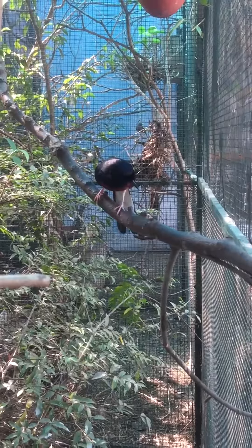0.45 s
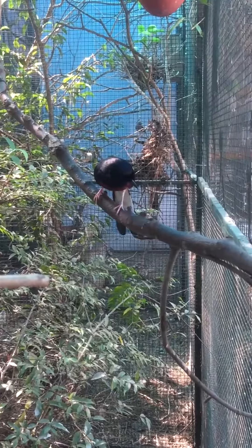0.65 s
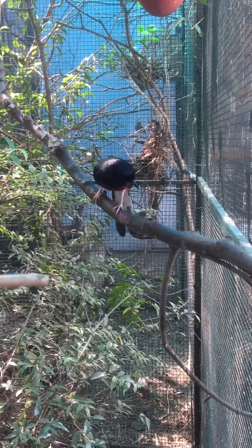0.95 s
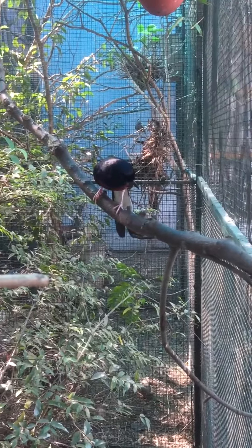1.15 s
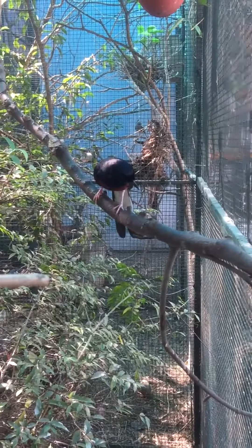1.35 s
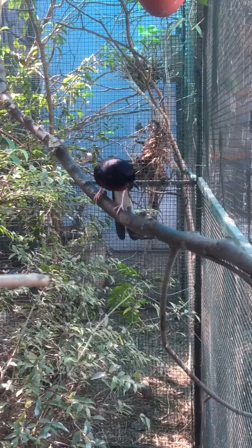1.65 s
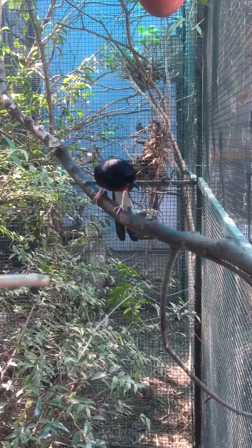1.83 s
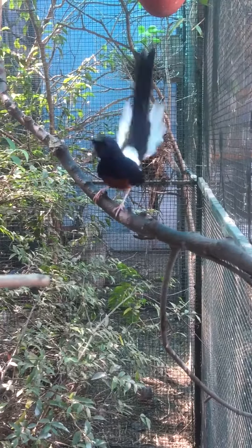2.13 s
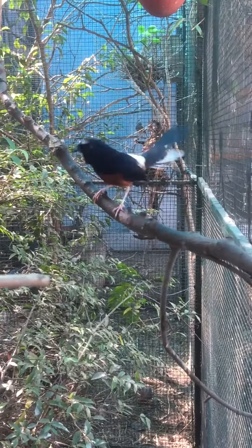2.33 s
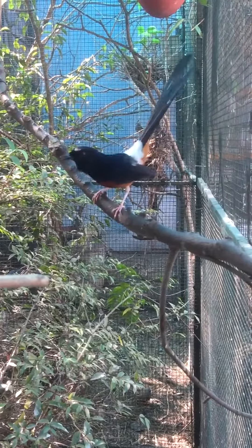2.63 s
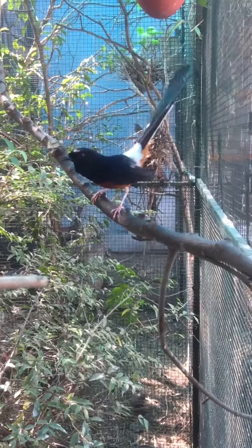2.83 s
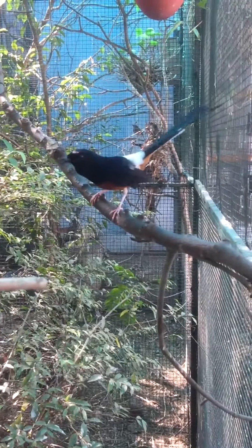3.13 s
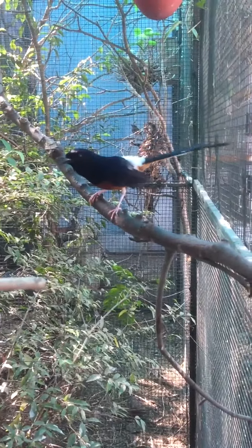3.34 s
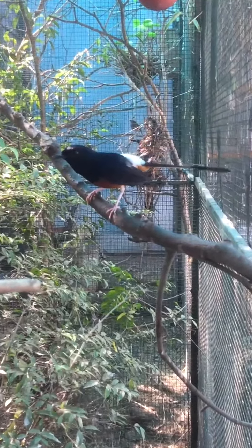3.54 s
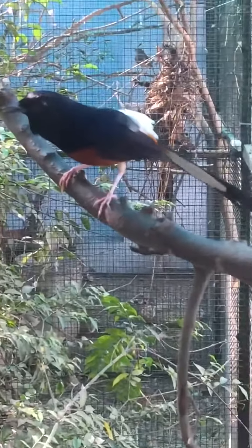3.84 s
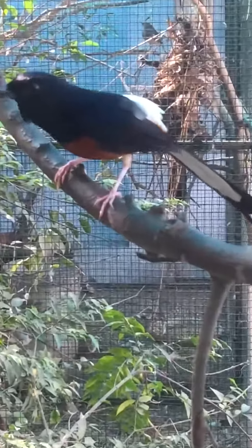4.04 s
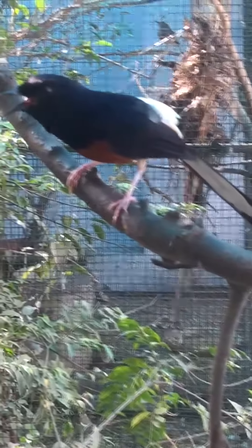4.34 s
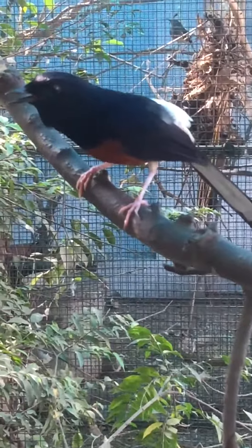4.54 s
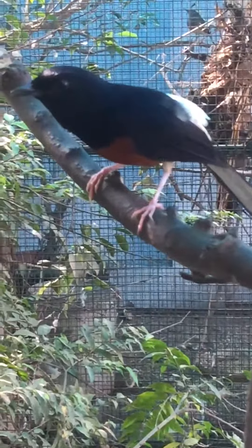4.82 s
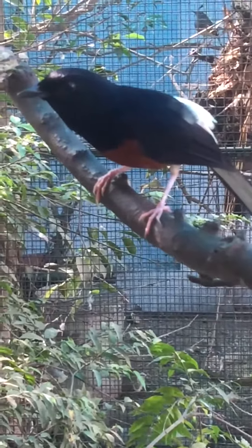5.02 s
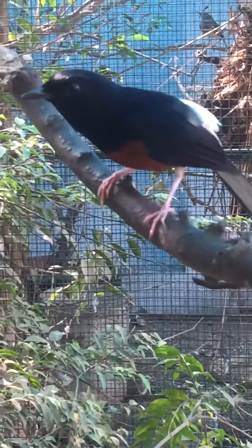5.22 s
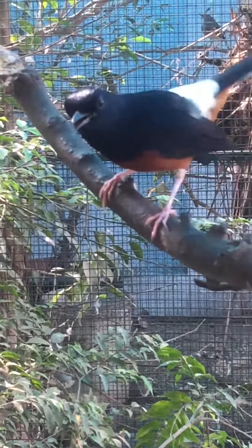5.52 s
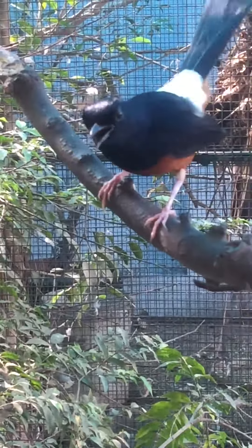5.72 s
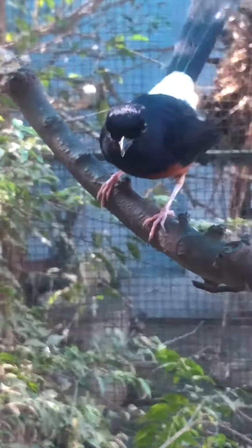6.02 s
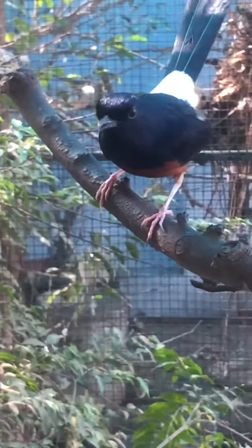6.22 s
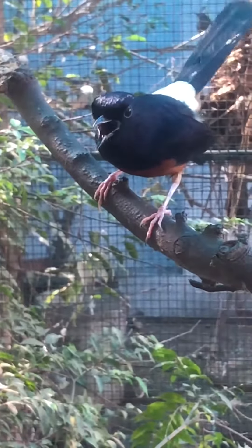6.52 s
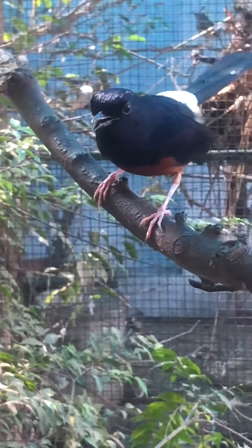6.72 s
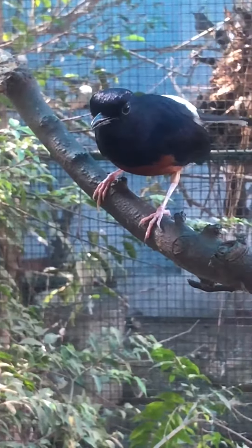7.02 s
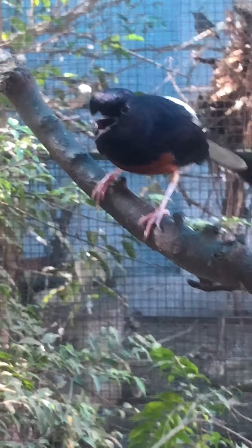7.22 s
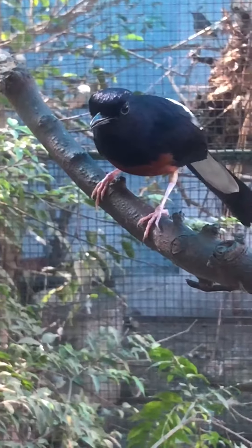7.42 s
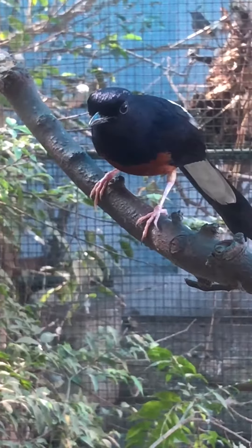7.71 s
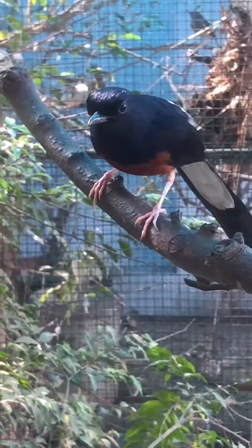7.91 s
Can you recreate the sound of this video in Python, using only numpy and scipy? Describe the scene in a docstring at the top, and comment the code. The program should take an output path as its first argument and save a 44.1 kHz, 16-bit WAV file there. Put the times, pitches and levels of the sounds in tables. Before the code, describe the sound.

Hoarse screeches and a long falling whistle lead into a shama's fast, varied song, with bill snaps, soft coos and chirping neighbours around it.

```python
"""A hoarse screech and a long falling whistle open over a low town rumble: a shama sings in an aviary.
Its low voice warbles and rattles as a few harmonics shaped by the throat; its high voice whistles, trills
and rasps as near sines on pitch curves, and noise bursts make the snaps of its bill.
Other birds coo, chip and chirp around it, made as whistles or roughened tones.
Near reflections and scattered echoes smear the glides; filtered noise and a wavering hum make the rumble."""
import sys
import numpy as np
from scipy import signal
from scipy.fft import rfft, irfft, next_fast_len
from scipy.io import wavfile
from scipy.ndimage import uniform_filter1d

SR = 44100
rng = np.random.default_rng(int(sys.argv[2]) if len(sys.argv) > 2 else 0)


def materialize(psi):
    """Save the field psi as 16-bit PCM at rate SR to the path in sys.argv[1].

    A 1-D psi becomes a single channel; in a 2-D psi each row is a channel.
    """
    bounded = np.clip(np.atleast_2d(psi).T, -1, 1)
    quanta = np.round(bounded * 32767).astype(np.int16)
    wavfile.write(sys.argv[1], SR, quanta)


N = 355446  # length [samples]

# spectral colour of screeches and of the hiss in a rasp: (frequency [Hz], gain [dB])
SCREECH_COLOUR = [(1500, -19.5), (2800, 1), (4300, -1), (5650, 1), (7100, -7), (14000, -12.5)]
# sharp "tchik" calls: (time of the peak [s], level [dB])
TCHIK_CALLS = [(5.7189, -6.5), (7.235, -6.5)]
# starting level of the overtones, before the windpipe colours them [dB]
PURE_OVERTONE_DB, BRIGHT_OVERTONE_DB = -37, -25


def amp(db):
    """The decibel law: 20 dB is a factor of ten in amplitude."""
    return 10 ** (np.asarray(db) / 20)


def unit(x):
    """Normalization by root mean square."""
    return x / np.sqrt(np.mean(x ** 2) + 1e-20)


def read(points, hz):
    """Interpolation of a (frequency [Hz], value) curve along log frequency."""
    f, value = np.transpose(points)
    return np.interp(np.log(hz + 1), np.log(f), value)


def colour(x, points):
    """Linear filtering: the spectrum is multiplied by a (frequency [Hz], gain [dB]) curve."""
    size = next_fast_len(2 * len(x))
    gain = amp(read(points, np.fft.rfftfreq(size, 1 / SR)))
    return irfft(rfft(x, size) * gain, size)[:len(x)]


def wander(size, hz):
    """Low-passed Gaussian noise: smooth chance of rms 1, up to about hz."""
    low_pass = np.exp(-(np.fft.rfftfreq(size, 1 / SR) / hz) ** 2)
    return unit(irfft(rfft(rng.standard_normal(size)) * low_pass, size))


def add(mix, s, sound):
    """Superposition: adds a sound in place at s seconds, cut to the bounds of the mix."""
    at = round(s * SR)
    sound = sound[max(-at, 0):]
    part = mix[max(at, 0):][:len(sound)]
    part += sound[:len(part)]


def span(start, end):
    """Time base of a note: seconds into it, share gone by, and raised-sine edges that avoid clicks."""
    t = np.arange(max(round((end - start) * SR), 200)) / SR
    to_nearest_end = np.minimum(t, t[-1] - t)
    edges = np.sin(np.pi / 2 * np.minimum(to_nearest_end / 0.0034, 1)) ** 2
    return t, t / t[-1], edges


def glide(u, values):
    """Polynomial interpolation: one smooth arc through evenly spaced values."""
    return np.polyval(np.polyfit(np.linspace(0, 1, len(values)), values, len(values) - 1), u)


def arch(u, peak, first_db, last_db):
    """Swell and decay: a level in dB that climbs to zero at the share peak of a note, then sinks."""
    return np.interp(u, [0, np.clip(peak, .05, .95), 1], [first_db, 0, last_db])


def trace(points):
    """Start, smoothed pitch and strength of a note from its (time [s], pitch [Hz], level [dB]) curve."""
    s, hz, db = np.transpose(points)
    t, u, edges = span(s[0], s[-1])
    pitch = uniform_filter1d(np.interp(t + s[0], s, hz), size=129)
    return s[0], pitch, amp(np.interp(t + s[0], s, db)) * edges


def syrinx(hz, gain_db, count):
    """Harmonic synthesis below the Nyquist limit on a pitch curve; gain_db(k) is the k-th harmonic's level."""
    phase = 2 * np.pi * np.cumsum(hz) / SR
    return sum(amp(gain_db(k)) * (k * hz < SR / 2) * np.sin(k * phase) for k in range(1, count + 1))


def whistle(hz, overtone_db, jitter=0.0051, slope_db=3.0):
    """Source and filter: a quavering near sine whose weak overtones the windpipe colours."""
    # resonances of the windpipe: (frequency [Hz], gain [dB])
    windpipe = [(5500, -1.5), (9200, 2), (10800, -2), (12800, 3), (15500, 0)]
    hz = hz * (1 + jitter * wander(len(hz), 296.4))

    def gain_db(k):
        overtone = overtone_db - slope_db * (k - 2) + read(windpipe, k * hz)
        return (k > 1) * overtone  # the fundamental stays at 0 dB

    return syrinx(hz, gain_db, count=7)


def low_voice(hz):
    """Throat resonance: it favours the fundamental on crests and the octave in troughs."""
    # gain of the throat: (frequency [Hz], gain [dB])
    throat = [(550, -23), (740, -12.5), (950, 4), (1650, -2.5), (2100, -13), (3000, -61)]
    return syrinx(hz, lambda k: read(throat, k * hz), count=3)


def rasp(hz, scatter, overtone_db, air_db):
    """Random frequency modulation: pitch lurches and shakes by the share scatter, in coarse grains with hiss."""
    lurch_hz, grain_db, grain_hz = 130, 4, 150
    tone = whistle(hz * (1 + scatter * wander(len(hz), lurch_hz)), overtone_db, scatter / 2)
    hiss = unit(colour(rng.standard_normal(len(hz)), SCREECH_COLOUR))
    voice = unit(tone) + amp(air_db) * hiss
    grains = amp(grain_db * wander(len(hz), grain_hz))
    return unit(voice * grains * np.sin(np.linspace(0, np.pi, len(hz))))


def calls(rows, overtone_db, jitter):
    """Frequency glides along smooth arcs, under a tapered envelope."""
    out = np.zeros(N)
    for start, end, *pitch, db in rows:
        t, u, edges = span(start, end)
        note = whistle(glide(u, pitch), overtone_db, jitter)
        add(out, start, amp(db) * note * signal.windows.tukey(len(t), .6))
    return out


def screeches(pitch_hz=1460, droop=0.07, edge_s=0.045):
    """Frequency modulation by noise: a hoarse voice arches, its shaking spreads each harmonic into a band."""
    # long reedy screeches: (start [s], end [s], level [dB])
    screech_notes = [(-0.04, 0.106, -34.5), (0.169, 0.35, -39), (0.372, 0.62, -34)]
    scatter, shake_hz, air, sway, flutter_db = .03, 230, .13, .022, 1.8
    out = np.zeros(N)
    for start, end, db in screech_notes:
        t, u, edges = span(start, end)
        shake = scatter * wander(len(t), shake_hz) + sway * wander(len(t), 19.5)
        hz = pitch_hz * (1 - droop * (2 * u - 1) ** 2 + shake)
        reed = unit(syrinx(hz, lambda k: 0, count=10))
        voice = colour(reed + air * rng.standard_normal(len(t)), SCREECH_COLOUR)
        flutter = amp(flutter_db * wander(len(t), 21))
        ramps = np.minimum(np.minimum(t, t[-1] - t) / edge_s, 1)
        add(out, start, amp(db) * unit(voice * flutter * ramps))
    return out


def long_falls():
    """Downward frequency glides: each whistle swells in, sinks in pitch and dies away."""
    # two long falling whistles, one curve each: (time [s], pitch [Hz], level [dB])
    fall_curves = [
        [(0, 2340, -29.5), (0.037, 2204, -20.5), (0.145, 1686, -17.5), (0.241, 1220, -31), (0.375, 902, -41)],
        [(1.205, 2500, -50), (1.241, 2380, -20.5), (1.338, 1693, -19.5), (1.38, 1523, -28.5), (1.49, 1103, -53),
         (1.61, 884, -45)],
    ]
    return [trace(points) for points in fall_curves]


def background(hum_hz=121):
    """Coloured noise and a frequency-wandering sine: town rumble with a wavering hum."""
    # spectral colour of the rumble: (frequency [Hz], gain [dB])
    rumble_colour = [(25, -30), (62, -1), (120, -2), (230, -16), (380, -17), (550, -28), (4000, -22),
                     (15000, -54)]
    # level of the rumble: (time [s], level [dB])
    rumble_level = [(0.2, -52.5), (0.5, -44), (1.1, -43.5), (1.4, -55), (2, -42), (3.3, -47)]
    # swell of the low hum: (time [s], level [dB])
    hum_level = [(0, -64), (.7, -39), (1.5, -61.5), (7.2, -42.5), (8, -48)]
    t = np.arange(N) / SR
    rumble = unit(colour(rng.standard_normal(N), rumble_colour)) * amp(0.86 * wander(N, 9.4))
    rumble = rumble * amp(np.interp(t, *np.transpose(rumble_level)))
    hum = np.sin(2 * np.pi * np.cumsum(hum_hz + 12 * wander(N, 20.13)) / SR)
    return rumble + hum * amp(np.interp(t, *np.transpose(hum_level)))


def chatter(count=520, low_hz=1900, high_hz=6800, sweep=.3, loud_db=-42, spread_db=14):
    """Random superposition: short rough chirps of distant birds, spread evenly in time and log pitch."""
    out = np.zeros(N)
    for when, height, length, slope, far in rng.random((count, 5)):
        t, u, edges = span(0, .02 + .06 * length)
        bend = (2 * slope - 1) * u - (2 * u - 1) ** 2 / 2
        hz = low_hz * (high_hz / low_hz) ** height * (1 + sweep * bend)
        chirp = whistle(hz, -12.5, 0.015) * np.sin(np.pi * u) * edges
        add(out, when * N / SR, amp(loud_db - spread_db * far) * chirp)
    return out


def neighbours(peep_s=0.045, first_hz=5300, top_hz=6500):
    """Pure and noise-modulated glides of other birds: thin chips, hoarse chirps, upward-scooping peeps."""
    # thin chips: (start [s], end [s], first pitch [Hz], last pitch [Hz], level [dB])
    chip_notes = [(0.28, 0.305, 7720, 7900, -31), (1.76, 1.9, 3870, 4500, -47.5),
                  (1.765, 1.86, 5830, 5700, -42), (1.922, 1.94, 2800, 7200, -32.5),
                  (4.015, 4.04, 7400, 8100, -28.5), (5.58, 5.63, 6460, 5500, -35)]
    # hoarse chirps: (start [s], end [s], first pitch [Hz], last pitch [Hz], level [dB])
    hoarse_notes = [(0.901, 0.99, 2350, 2200, -39), (1.033, 1.077, 8200, 6900, -35),
                    (2.313, 2.345, 8140, 6900, -40.5), (4.888, 5.085, 6060, 4400, -39.5),
                    (5.257, 5.381, 7240, 6200, -41.5), (5.356, 5.54, 3440, 4550, -45),
                    (6.244, 6.36, 4100, 3700, -45.5)]
    # rising peeps: (start [s], level [dB])
    peep_notes = [(4.25, -32.5), (6.496, -35.5), (6.629, -35.5), (6.789, -38.5), (7.466, -35)]
    out = calls(chip_notes, PURE_OVERTONE_DB, 0.016)
    for start, end, *pitch, db in hoarse_notes:
        t, u, edges = span(start, end)
        add(out, start, amp(db) * rasp(glide(u, pitch), .065, BRIGHT_OVERTONE_DB, air_db=-12))
    t, u, edges = span(0, peep_s)
    for s, db in peep_notes:
        hz = top_hz + (first_hz - top_hz) * (1 - u) ** 2
        add(out, s, amp(db) * whistle(hz, PURE_OVERTONE_DB, 0.024) * np.sin(np.pi * u))
    return out


def held_notes(scoop_s=0.019, sag=0.068, sag_s=0.00806, peak=0.57, first_db=-6, last_db=-6):
    """Exponential relaxation: pitch scoops to a held value, and sags as the note lets go."""
    # high notes: (start [s], end [s], first pitch [Hz], held pitch [Hz], level [dB])
    held_rows = [(0.573, 0.666, 4300, 4480, -24.5), (1.225, 1.273, 4100, 4460, -22.5),
                 (1.293, 1.362, 4000, 4000, -21.5), (3.302, 3.338, 3000, 3626, -23),
                 (4.098, 4.201, 4090, 4206, -21.5), (5.628, 5.737, 3390, 4113, -24.5),
                 (5.839, 5.954, 3530, 4194, -24), (6.03, 6.158, 3440, 4273, -25)]
    for start, end, first_hz, held_hz, db in held_rows:
        t, u, edges = span(start, end)
        scoop = held_hz + (first_hz - held_hz) * np.exp(-t / scoop_s)
        hz = scoop * (1 - sag * np.exp((t - t[-1]) / sag_s))
        yield start, hz, amp(db + arch(u, peak, first_db, last_db)) * edges


def slides(rows, peak, first_db, last_db):
    """Power-law frequency glide: pitch bends from one value to another under a single swell."""
    for start, end, first_hz, last_hz, bend, db in rows:
        t, u, edges = span(start, end)
        hz = first_hz + (last_hz - first_hz) * u ** bend
        yield start, hz, amp(db + arch(u, peak, first_db, last_db)) * edges


def rasps(overtone_db=-15):
    """Noise-modulated oscillation: short scratchy bursts of the high voice."""
    # harsh rasps: (start [s], end [s], level [dB], centre pitch [Hz])
    rasp_notes = [(1.186, 1.328, -34.5, 3940), (1.483, 1.572, -31, 4165), (1.578, 1.674, -31.5, 4800),
                  (4.005, 4.095, -29, 4145), (4.339, 4.44, -29, 4200), (4.584, 4.657, -29.5, 4310),
                  (4.685, 4.767, -31.5, 4930)]
    scatter, air_db = .11, -4
    out = np.zeros(N)
    for start, end, db, hz in rasp_notes:
        t, u, edges = span(start, end)
        add(out, start, amp(db) * rasp(np.full(len(t), float(hz)), scatter, overtone_db, air_db))
    return out


def flicks(base_hz=4250, leap_hz=1700, lead=0.046, quaver=0.0234):
    """Exponential upsweep: a thin wavering note, strongest in its second harmonic, whips upward at its end."""
    # times of the upward whips (time [s]), all at one level [dB]
    flick_times = [2.003, 2.086, 2.163, 2.245, 2.332]
    flick_db = -32
    out = np.zeros(N)
    for s in flick_times:
        t, u, edges = span(s - lead, s + 0.0051)
        whip = np.exp((t - t[-1]) / 0.0055)
        shake = quaver * (wander(len(t), 14.9) + whip * wander(len(t), 1500))
        hz = (base_hz + leap_hz * whip) / 2 * (1 + shake)  # the fundamental, an octave below
        note = syrinx(hz, lambda k: -6 * abs(k - 2), count=6)
        add(out, s - lead, amp(flick_db) * note * edges * (np.sqrt(u) + whip))
    return out


def snaps(decay=0.0042):
    """Broadband impulse: the bill claps shut in a short bright crack of decaying noise."""
    # snaps of the bill: (time [s], peak level [dB])
    snap_times = [(2.04, -17), (2.051, -15.5), (2.236, -21), (2.2493, -16.5), (5.541, -20), (5.55, -20.5)]
    out, t = np.zeros(N), np.arange(600) / SR
    for s, db in snap_times:
        burst = rng.standard_normal(len(t)) * np.exp(-t / decay)
        crack = colour(burst, [(400, -15), (900, 3.0), (6000, 4.0), (14000, -15)])
        add(out, s, amp(db) * crack / abs(crack).max())
    return out


def warbles(crest_hz=1010, trough_hz=745, rest_hz=600, lead=0.064, close=0.03, count=4):
    """Slow frequency modulation: the low voice swings between crests and a common trough, slowing as it goes."""
    # warbles: (first crest [s], last crest [s], slowing [0-1], pitch of the first crest [Hz], level [dB])
    warble_rows = [(2.512, 2.665, 0.49, 1232, -31.5), (3.923, 4.065, 0.15, 1096, -31.5),
                   (6.083, 6.225, 0.06, 1028, -30.5)]
    out = np.zeros(N)
    for first, last, slowing, first_hz, db in warble_rows:
        share = np.linspace(0, 1, 2 * count - 1)
        turns = first + (last - first) * share * (1 - slowing * (1 - share))
        times = np.r_[first - lead, turns, last + close]
        pitch = np.full(len(times), float(trough_hz))
        pitch[1::2], pitch[1], pitch[[0, -1]] = crest_hz, first_hz, rest_hz
        t, u, edges = span(times[0], times[-1])
        step = np.interp(t + times[0], times, np.arange(len(times)))
        eased = np.floor(step) + np.sin(np.pi / 2 * (step % 1)) ** 2  # rounds each turning point
        hz = np.interp(eased, np.arange(len(times)), pitch)
        level = amp(db) * np.minimum(t / lead, 1)  # swells up to the first crest
        add(out, times[0], low_voice(hz) * edges * level)
    return out


def rattles(pulse_hz=175, unevenness=0.082, top_hz=835, rise=0.029, ring_hz=1250, ring_s=0.0011):
    """Pulse excitation of a damped resonator: a rising tone breaks into uneven pulses that ring the throat."""
    # rattles: (start [s], pulsing from [s], end [s], tone level [dB], rattle level [dB])
    rattle_rows = [(2.781, 2.851, 2.966, -24, -29.5), (4.162, 4.245, 4.322, -23, -28.5),
                   (6.335, 6.39, 6.515, -26.5, -26.5)]
    # colour of the rattle, with the throat wide: (frequency [Hz], gain [dB])
    wide_throat = [(550, -27.5), (850, -2.5), (1750, -2), (2700, -7), (12000, -24)]
    out = np.zeros(N)
    for start, broken, end, tone_db, rattle_db in rattle_rows:
        t, u, edges = span(start, broken + 0.0037)
        hz = top_hz - 280 * np.exp(-(t / rise) ** 2)
        hz = hz * (1 + 0.042 * wander(len(t), 350))
        tone = syrinx(hz, lambda k: -11 * abs(k - 2), count=2)  # the octave is the stronger
        swell = np.interp(u, [0, .75, 1], [.2, 1, .8]) ** 2
        add(out, start, amp(tone_db) * tone * edges * swell)

        t, u, edges = span(broken - .02, end)
        turns = np.cumsum(pulse_hz * (1 + unevenness * wander(len(t), 191))) / SR
        age, which = (turns % 1) / pulse_hz, turns.astype(int)  # nominal time since each pulse began
        pulse_pitch = ring_hz * (1 + 0.059 * rng.standard_normal(which.max() + 1))[which]
        pulses = age * np.exp(-age / ring_s) * np.sin(2 * np.pi * pulse_pitch * age)
        breath = 0.96 * wander(len(t), 6300) * np.exp(-age / (3 * ring_s))
        voice = colour(unit(pulses) + breath, wide_throat)
        add(out, broken - .02, amp(rattle_db) * unit(voice * signal.windows.tukey(len(t), .2)))
    return out


def plunges(first_hz=2280, crest_hz=2690, knee_hz=2230, late_hz=1450, last_hz=930,
            knee=.43, late=0.82, dip_db=-27, last_db=-28):
    """Piecewise frequency glide: an arched hook, a dip in strength at its knee, then a fall that steepens."""
    # hooked whistles: (start [s], end [s], hook level [dB], plunge level [dB])
    plunge_rows = [(3.05, 3.227, -17, -15), (4.403, 4.586, -20.5, -19), (6.573, 6.764, -21.5, -16)]
    for start, end, hook_db, plunge_db in plunge_rows:
        t, u, edges = span(start, end)
        hook = glide(u / knee, [first_hz, crest_hz, knee_hz])
        fall = np.interp(u, [knee, late, 1], [knee_hz, late_hz, last_hz])
        db = np.interp(u, [0, knee / 3, knee, .73, 1], [dip_db, hook_db, dip_db - 2.0, plunge_db, last_db])
        yield start, np.where(u < knee, hook, fall), amp(db) * edges


def trills(first_hz=1620, top_hz=2050, climb_hz=110, rise_s=0.033, fade_db=17):
    """Joint frequency and amplitude modulation: a rising whistle throbs in pitch and strength."""
    # buzzy trills: (start [s], end [s], level [dB])
    trill_notes = [(3.281, 3.455, -19), (4.639, 4.783, -17), (6.821, 7.024, -19.5)]
    beat_hz, swing_hz, throb = 88, 90, .42
    out = np.zeros(N)
    for start, end, db in trill_notes:
        t, u, edges = span(start, end)
        beat = 2 * np.pi * np.cumsum(beat_hz * (1 + 0.2 * wander(len(t), 105))) / SR
        rise = top_hz + (first_hz - top_hz) * np.exp(-t / rise_s) + climb_hz * u
        note = whistle(rise + swing_hz * np.sin(beat), -23.5) * (1 + throb * np.cos(beat))
        add(out, start, note * edges * amp(db + arch(u, 0.21, -fade_db, -fade_db)))
    return out


def coos(peak=0.71, first_db=-17, last_db=-6):
    """Near-sinusoidal tones: soft low whistles; the short ones all swell late and droop alike at the end."""
    # soft long whistles further off: (start [s], end [s], first, middle and last pitch [Hz], level [dB])
    far_whistles = [(3.544, 3.793, 1009, 940, 960, -31.5), (6.562, 7.229, 1447, 1275, 1032, -38.5)]
    # short low coos, in one run that fades and one that grows: (start [s], pitch [Hz], level [dB])
    coo_notes = [(3.895, 995, -19.5), (4.125, 956, -31.5), (4.326, 917, -25), (4.53, 892, -32),
                 (4.74, 880.7, -40), (4.95, 890, -43), (7.526, 1014, -33), (7.723, 1000, -27.5),
                 (7.901, 997, -24)]
    coo_s, coo_shape = 0.085, (0.95, 1.01, 0.906)  # length; pitch at start, middle and end as a share
    out = calls(far_whistles, BRIGHT_OVERTONE_DB, 0.0074)
    t, u, edges = span(0, coo_s)
    for s, hz, db in coo_notes:
        note = whistle(hz * glide(u, coo_shape), BRIGHT_OVERTONE_DB, 0.0049)
        add(out, s, note * amp(db + arch(u, peak, first_db, last_db)) * edges)
    return out


def tchik_skirts(wobble_hz=105, wobble=0.32, wobble_s=0.021, half_db=-3, half_s=0.028):
    """Subharmonics: half harmonics roughen the upsweep and fade after the peak, as the voice shudders and falls."""
    # voice of every tchik: (time after its peak [s], pitch [Hz], level against the peak [dB])
    tchik_curve = [(-0.016, 1970, -30), (-0.001, 3694, -11.5), (0.012, 3690, -13.5), (0.035, 2387, -28.5),
                   (0.083, 1680, -29), (0.103, 1340, -29.5)]
    # colour of the open bill: (frequency [Hz], gain [dB])
    open_bill = [(1200, -5), (3500, -2.5), (5000, 3.5), (7000, -9), (15000, -10)]
    out = np.zeros(N)
    for s, db in TCHIK_CALLS:
        start, hz, level = trace(tchik_curve)
        t = start + np.arange(len(hz)) / SR
        after = np.maximum(t, 0)
        shudder = wobble * np.minimum(after / 0.0046, 1) * np.exp(-after / wobble_s)
        shudder = shudder * np.cos(2 * np.pi * wobble_hz * (after - .002))
        half_hz = hz * (1 + shudder + 0.021 * wander(len(t), 390)) / 2

        def gain_db(k):
            half_harmonic = half_db - 8 * after / half_s - 20 * (k == 1)
            return read(open_bill, k * half_hz) + k % 2 * half_harmonic  # odd k only

        add(out, s + start, amp(db) * level * syrinx(half_hz, gain_db, count=14))
    return out


def tchiks(edge_hz=4550, top_hz=5520, length_s=0.012, edge_db=-13):
    """Short tone burst: the piercing peak of each tchik is a brief arch of nearly pure tone."""
    out = np.zeros(N)
    for s, db in TCHIK_CALLS:
        t, u, edges = span(0, length_s)
        level = amp(db + edge_db * (2 * u - 1) ** 2) * edges
        add(out, s - length_s / 2, whistle(glide(u, [edge_hz, top_hz, edge_hz]), -48, 0.00087) * level)
    return out


def song(waver_db=3, waver_hz=55):
    """Superposition of the whistled notes, each kind with its overtones, and the part that reaches the walls."""
    # mellow sliding whistles: (start [s], end [s], first pitch [Hz], last pitch [Hz],
    # bend [exponent; under 1 moves early, over 1 late], level [dB])
    slide_rows = [(0.878, 0.975, 1922, 1840, 0.38, -29), (1.961, 2.227, 2113, 1790, 3.9, -23.5),
                  (2.368, 2.599, 1899, 2500, 1.16, -26), (2.659, 2.755, 3087, 2670, 0.5, -21.5),
                  (2.783, 2.896, 2793, 2360, 2.5, -24.5), (2.966, 3.057, 2985, 1800, 2, -23.5),
                  (3.142, 3.315, 2712, 3050, 8.4, -26), (3.308, 3.383, 3140, 5900, 0.36, -26.5),
                  (3.419, 3.528, 3086, 1780, 2.36, -24.5), (3.612, 3.837, 2450, 2740, 0.28, -28.5)]
    # quick down-slurs: (start [s], end [s], first pitch [Hz], last pitch [Hz], bend [exponent], level [dB])
    slur_rows = [(0.645, 0.695, 4430, 2740, 0.8, -26.5), (0.82, 0.87, 2960, 1820, 0.66, -29),
                 (1.186, 1.222, 4250, 2930, 1.17, -19.5), (1.29, 1.335, 4270, 2750, 0.91, -25.5),
                 (3.99, 4.03, 4460, 2690, 1.7, -18.5), (4.323, 4.365, 4520, 3280, 0.89, -21.5)]
    # two crisp twitters, one peaked and one with two humps and a flick down: (time [s], pitch [Hz], level [dB])
    twitter_curves = [
        [(7.612, 4000, -32), (7.652, 6000, -20), (7.665, 5730, -30.5), (7.692, 4800, -23.5)],
        [(7.733, 4400, -28), (7.752, 4690, -25), (7.772, 4576, -17.5), (7.783, 4770, -23.5),
         (7.801, 4570, -20.5), (7.809, 3600, -34)],
    ]
    mellow = slides(slide_rows, peak=0.26, first_db=-10, last_db=-6.5)
    slurs = slides(slur_rows, peak=0.46, first_db=-1.5, last_db=-7.5)
    # kinds of whistle: (notes, blur [dB], overtone level [dB])
    kinds = [(long_falls(), -17, PURE_OVERTONE_DB),
             (held_notes(), -5.5, BRIGHT_OVERTONE_DB),
             (slurs, -2.5, BRIGHT_OVERTONE_DB),
             (mellow, -2.5, BRIGHT_OVERTONE_DB),
             (plunges(), -11.5, BRIGHT_OVERTONE_DB),
             (map(trace, twitter_curves), -11.5, BRIGHT_OVERTONE_DB)]
    direct, spill = np.zeros((2, N))
    for notes, blur_db, overtone_db in kinds:
        blur = amp(blur_db)  # scales the quaver, the waver in strength and the share of echo
        for start, hz, level in notes:
            note = whistle(hz, overtone_db, .011 * blur) * level
            note = note * amp(waver_db * blur * wander(len(note), waver_hz))
            add(direct, start, note)
            add(spill, start, note * blur)
    return direct, spill


def near_echoes(x):
    """Interference: close reflections beat against each glide and make its strength ripple."""
    # reflections from the branch and the mesh: (delay [s], level [dB])
    reflections = [(0.0058, -19.5), (0.014, -24)]
    out = x.copy()
    for delay, db in reflections:
        add(out, delay, amp(db) * x)
    return out


def aviary(x):
    """Reverberation: scattered echoes from walls, mesh and leaves, each band dying at its own speed."""
    # ring of the enclosure: (frequency [Hz], time to decay by 60 dB [s])
    decay_times = [(1000, 0.21), (4000, 0.28), (13000, 0.16)]
    size = SR // 2
    sparse = rng.random(size) < .1
    late = np.arange(size) > .005 * SR
    taps = rng.standard_normal(size) * sparse * late
    hz, t, z = signal.stft(taps, SR)
    decay = amp(-60 * t / read(decay_times, hz)[:, None])
    tail = signal.istft(z * decay, SR)[1]
    return signal.fftconvolve(x, tail / np.linalg.norm(tail))[:N]


def scene():
    """Superposition of the singer's two voices, the birds around it, their echoes and the town."""
    whistles, spill = song()
    low = warbles() + rattles() + snaps()
    high = trills() + flicks()
    harsh = rasps() + screeches()
    sharp, far, others = tchik_skirts(), coos(), neighbours()
    to_walls = spill + amp(-12) * low + amp(-4.5) * high + amp(-3.5) * harsh
    to_walls = to_walls + amp(-11) * sharp + amp(-13.0) * far + others + chatter()
    singer = near_echoes(whistles) + tchiks() + sharp + low + high + harsh
    return (singer + far + others + aviary(to_walls) + background())[None]


def record(dry):
    """Linear filtering: the microphone's treble colour, then the band limit."""
    # response of the microphone: (frequency [Hz], gain [dB])
    microphone = [(8000, 3.5), (10400, 0), (12500, 4.5), (16000, -0.5)]
    edge_hz = 15900
    band_limit = signal.firwin(511, edge_hz, window=("kaiser", 9), fs=SR)
    return signal.oaconvolve(colour(dry[0], microphone), band_limit, "same")[None]


dry = scene()
out = record(dry)
materialize(out)
```